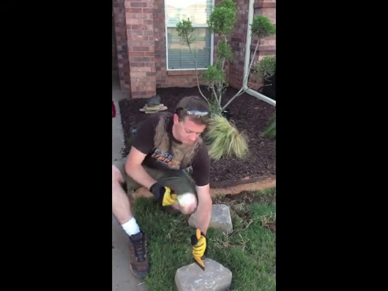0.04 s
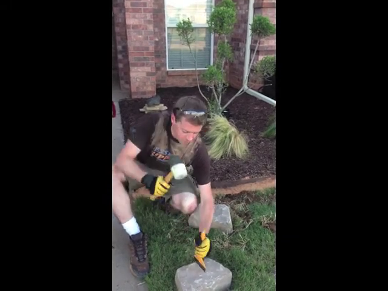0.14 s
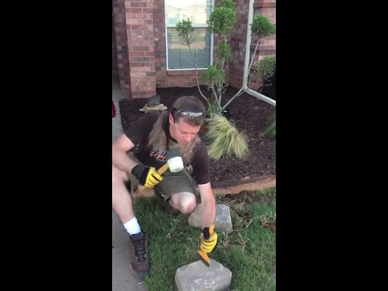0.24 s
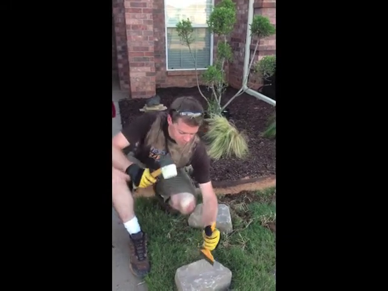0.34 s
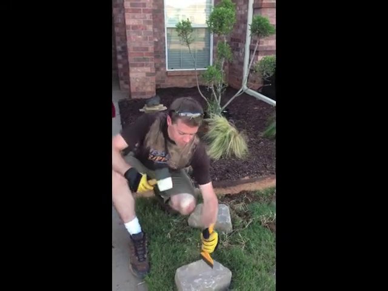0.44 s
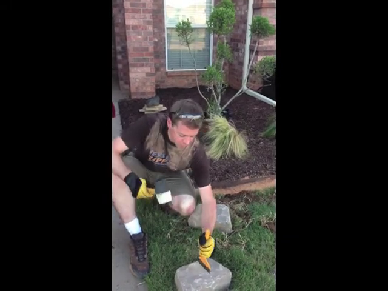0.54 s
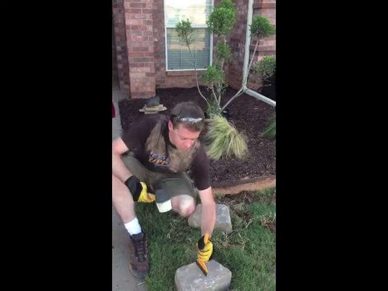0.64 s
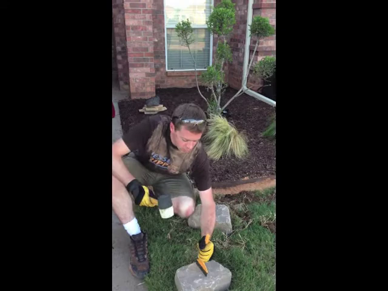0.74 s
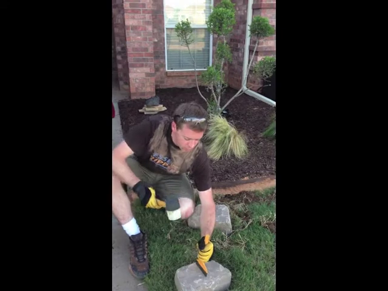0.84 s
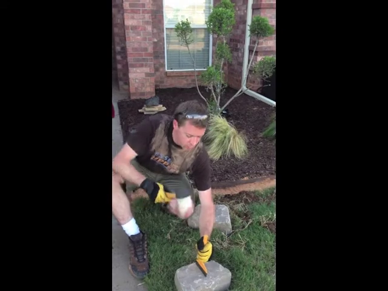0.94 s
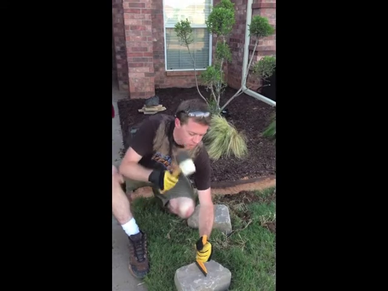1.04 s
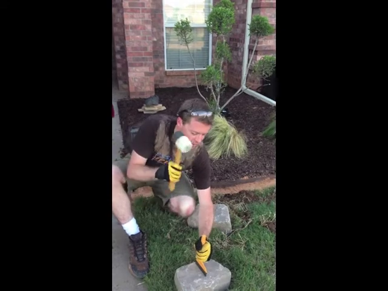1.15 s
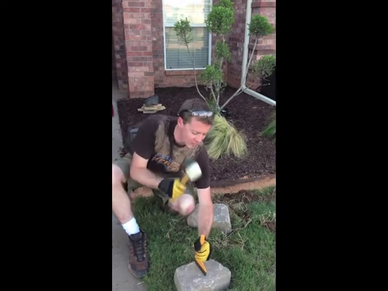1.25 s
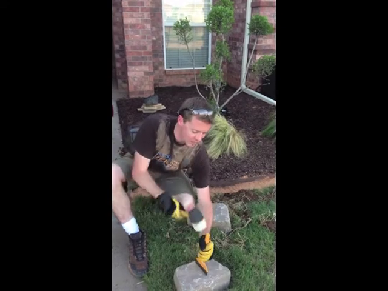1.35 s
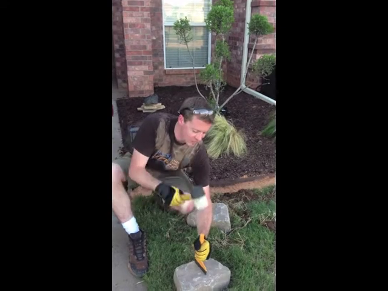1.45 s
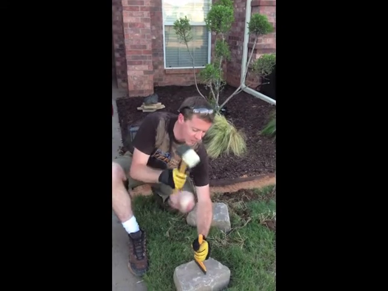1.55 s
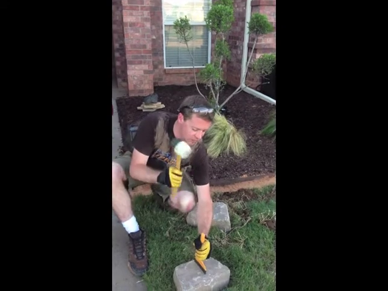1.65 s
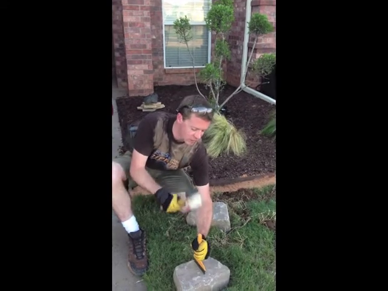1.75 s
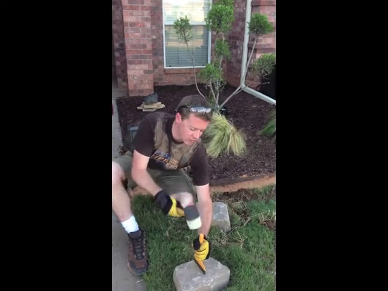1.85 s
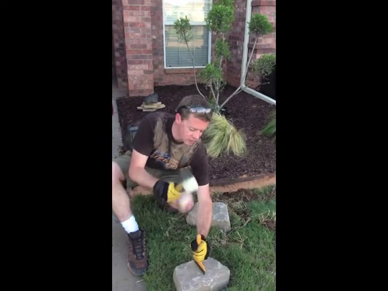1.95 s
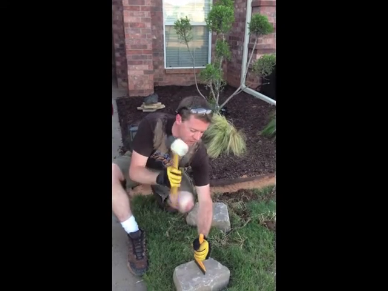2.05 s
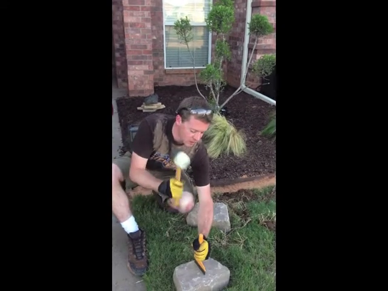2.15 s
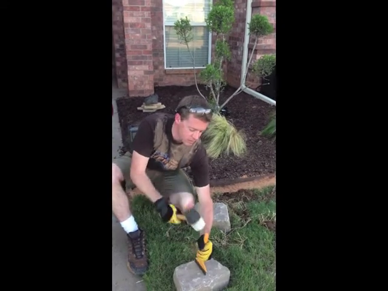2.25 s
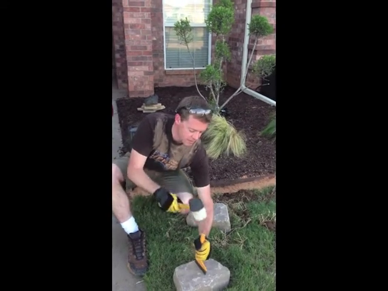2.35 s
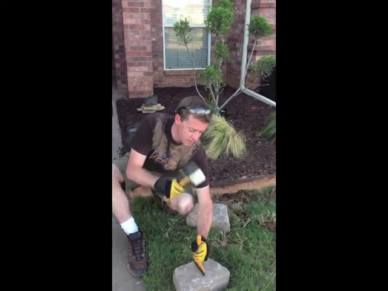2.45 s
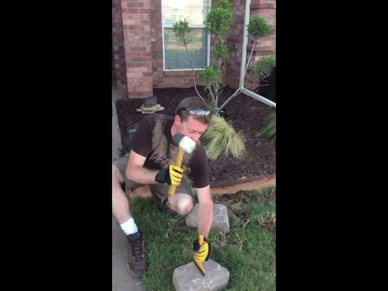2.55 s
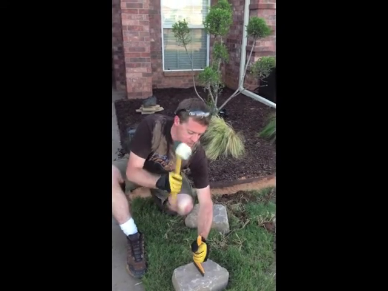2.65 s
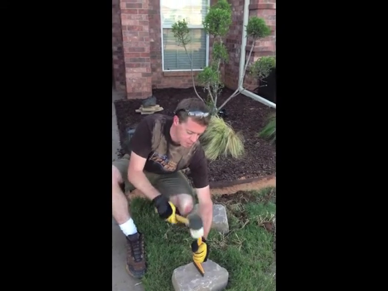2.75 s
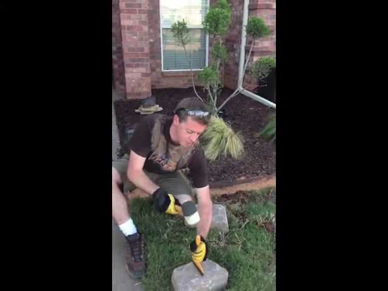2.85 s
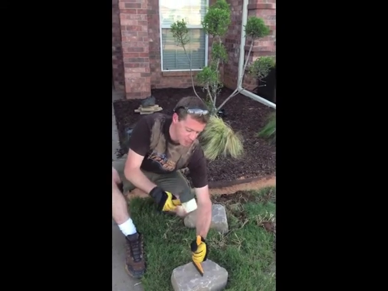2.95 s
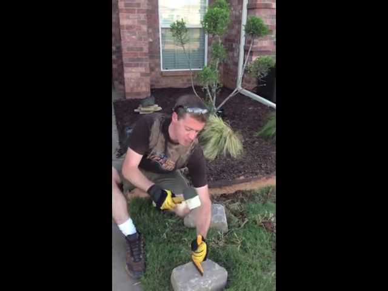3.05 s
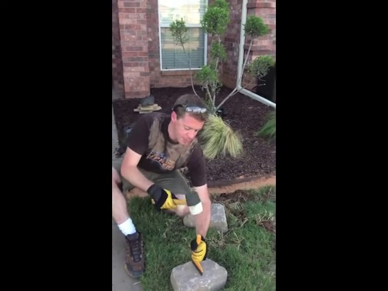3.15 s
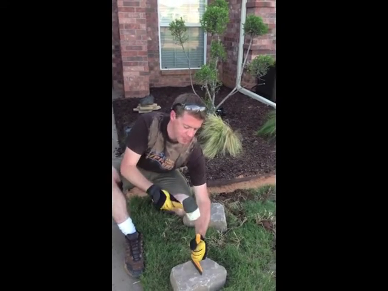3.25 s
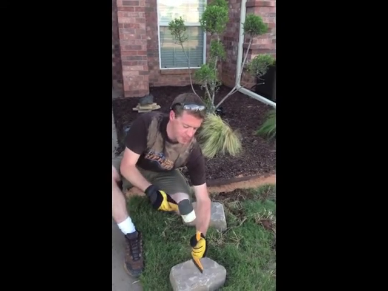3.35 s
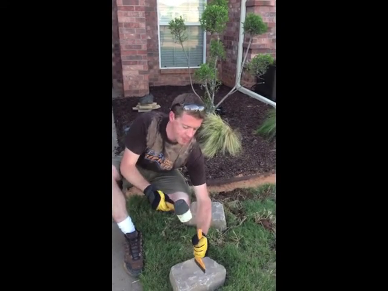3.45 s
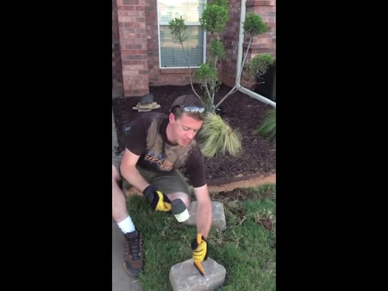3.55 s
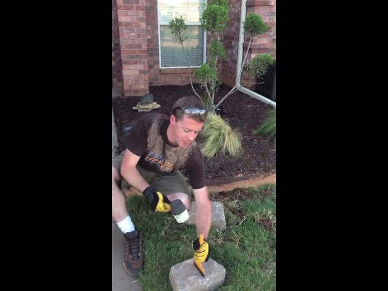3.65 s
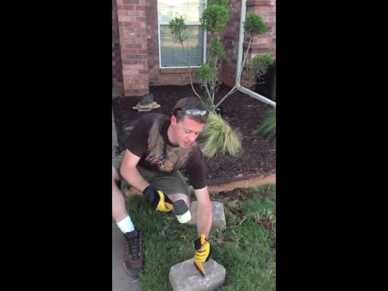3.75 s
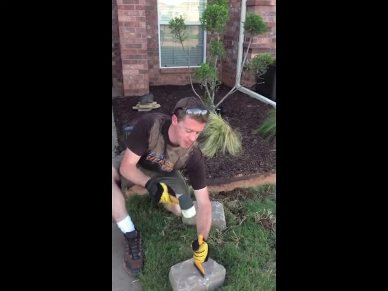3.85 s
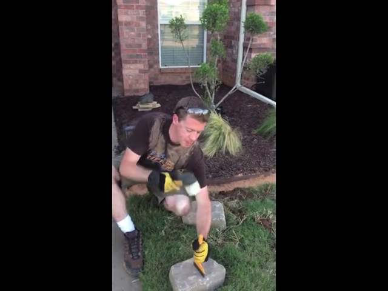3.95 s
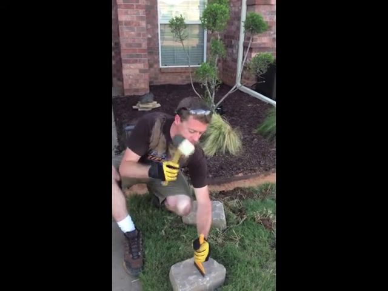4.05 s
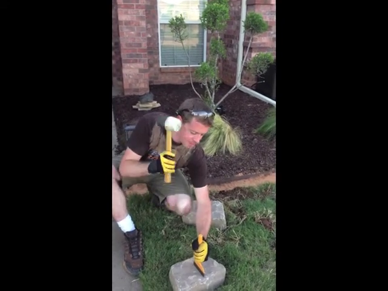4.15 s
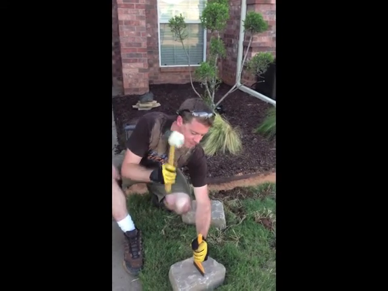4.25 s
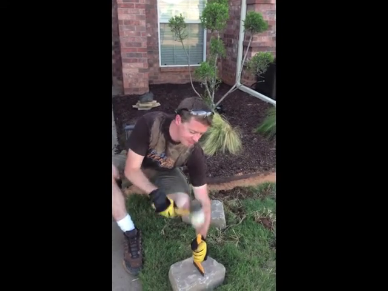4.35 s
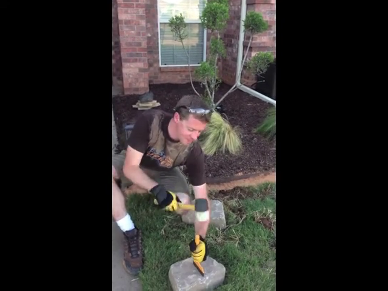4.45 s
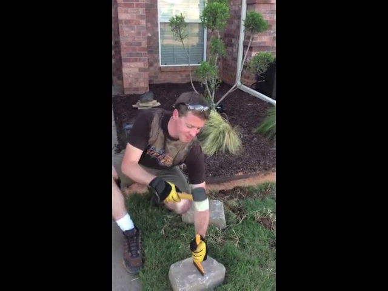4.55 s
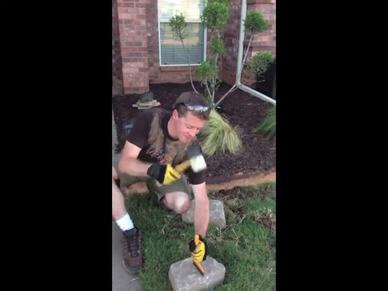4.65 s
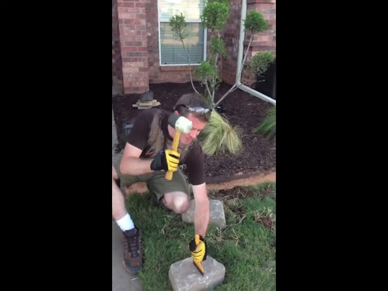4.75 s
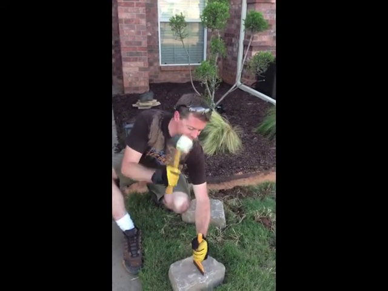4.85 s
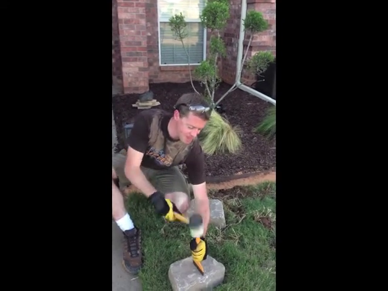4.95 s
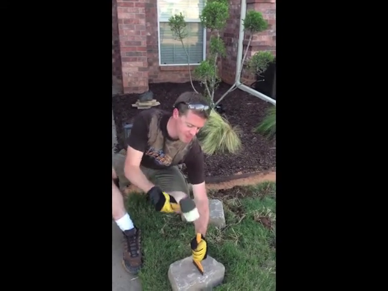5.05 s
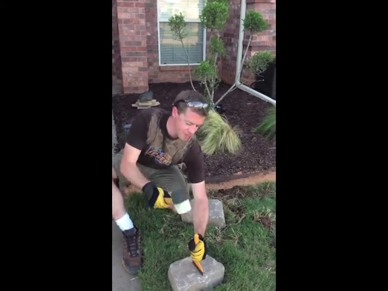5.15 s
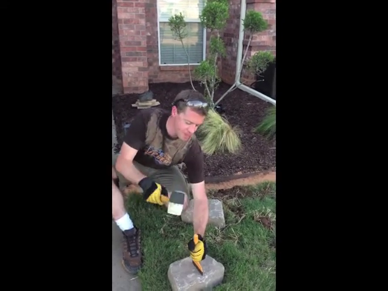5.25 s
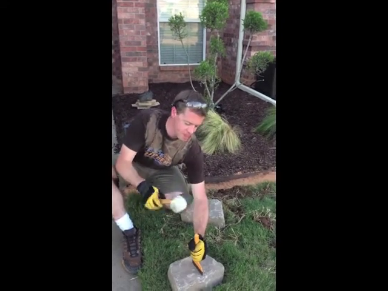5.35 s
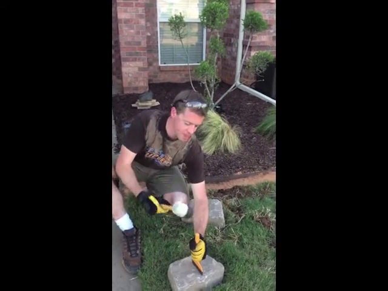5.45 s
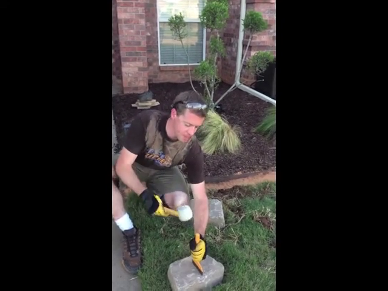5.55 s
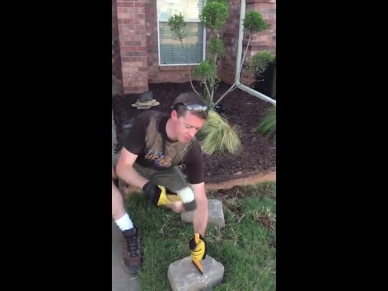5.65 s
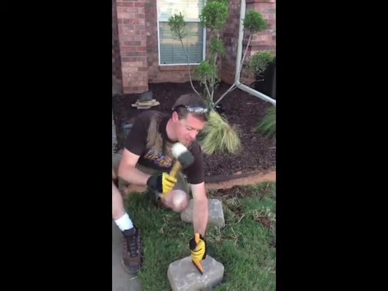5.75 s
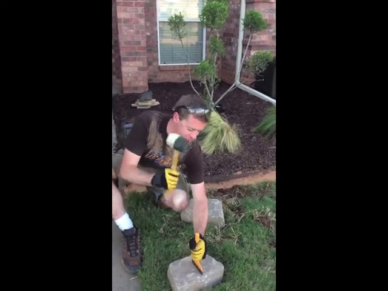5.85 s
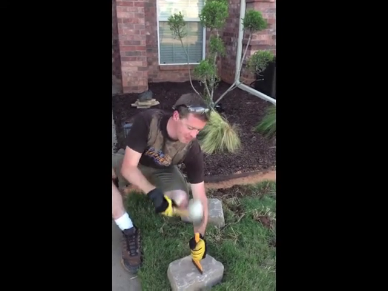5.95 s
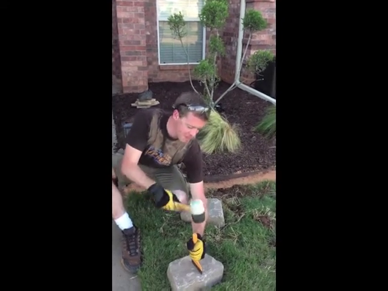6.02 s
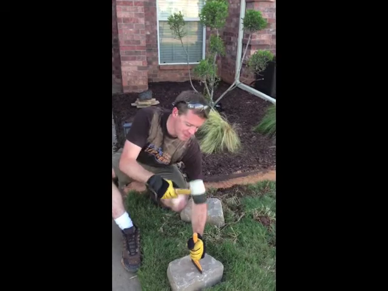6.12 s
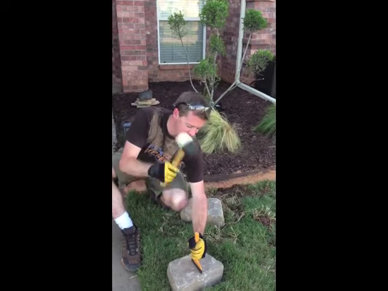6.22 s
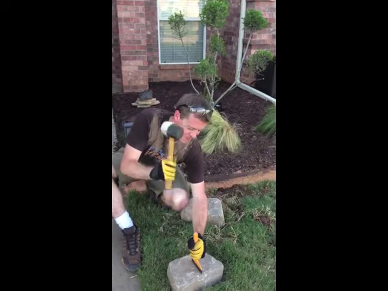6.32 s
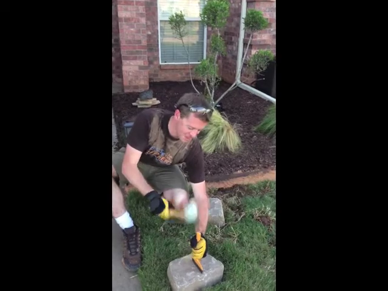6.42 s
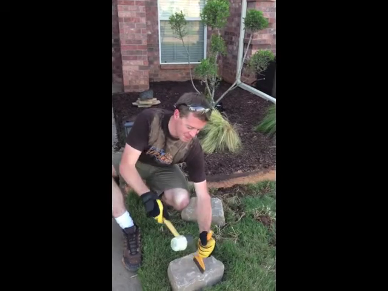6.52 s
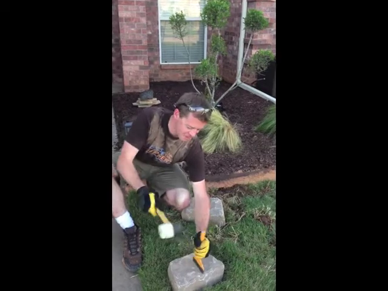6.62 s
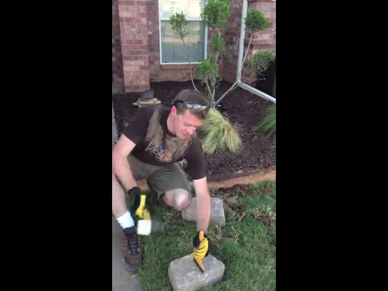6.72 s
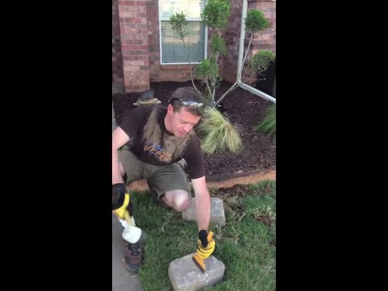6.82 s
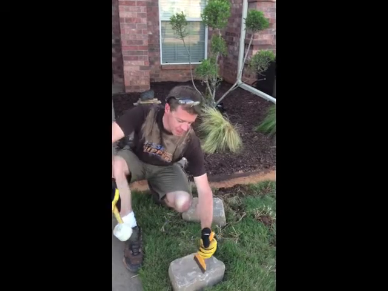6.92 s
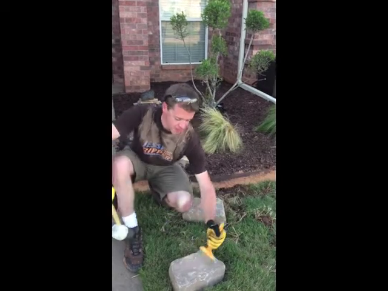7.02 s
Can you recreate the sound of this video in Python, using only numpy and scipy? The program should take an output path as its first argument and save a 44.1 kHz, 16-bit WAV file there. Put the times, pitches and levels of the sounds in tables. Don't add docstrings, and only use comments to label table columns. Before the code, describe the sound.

Ten or so irregular thudding, cracking blows on chisel and stone, the loose steel skipping and ringing, with wind puffs and distant traffic.

```python
import sys
import numpy as np
from scipy import signal
from scipy.fft import rfft, irfft, next_fast_len
from scipy.io import wavfile
from scipy.ndimage import uniform_filter1d

SR = 44100
rng = np.random.default_rng(int(sys.argv[2]) if len(sys.argv) > 2 else 0)


def unload_wav(signal):
    wavfile.write(
        sys.argv[1],
        SR,
        np.round(np.clip(np.atleast_2d(signal).T, -1, 1) * 32767).astype(np.int16),
    )


def volts(x):
    e = np.asarray(x, float) / 20
    return 10 ** e


N = 312228
LEAD = SR // 10
SPAN = SR // 3
T = np.arange(SPAN) / SR

# start in seconds, thud in dB, handle knock in dB over the thud.
BLOWS = [(-.05, -10, -16), (0.6899, -24.5, 3), (1.4034, -12.5, -7.5), (1.8641, -16.5, -1),
         (2.3108, -12, -5.5), (2.8302, -11.5, 2.5), (3.6366, -18, 5), (4.4452, -10, -6), (5.035, -9, -8.5),
         (6.0439, -4, -7), (6.5101, -9.5, -3)]
# crack in dB, its centre in Hz, first spike in dB,
# block note in Hz, that note in dB.
BITES = [(-9, 3100, -2, 3020, 6), (-16, 6500, -4.5, 1380, -16.5), (-6, 2700, -7.5, 1870, -6.5),
         (1.5, 3250, 5.5, 2800, -2), (-8, 2040, -35, 2130, -16), (-6.5, 2600, -5.5, 1970, -17),
         (-6.5, 3550, -0.5, 1450, -8.5), (0.5, 2920, 1.5, 2030, -3.5), (-12.5, 2100, -10.5, 1700, -11),
         (-4, 4050, -37, 2130, 2.5), (-8, 1200, -9, 2160, -5)]
# frequency in Hz, width in Hz, level in dB.
HEAD = [(248, 62, 3.5), (1040, 100, -7.5)]
# frequency in Hz, width in Hz.
HANDLE = (701, 264)
# frequency in Hz, width in Hz, level in dB.
SPOT = [(1480, 180, 0.5), (2150, 30, 3.5), (2375, 33, 2), (3130, 44, -2.5), (3830, 58, -4.5),
        (4430, 50, -6.5), (5550, 71, -2.5), (6850, 23, -5.5), (7910, 70, -9.5)]
# start in seconds, frequency in Hz, level in dB.
RINGS = [(.692, 6900, -44), (0.691, 12200, -36), (1.405, 11840, -28), (1.406, 8100, -26),
         (1.865, 2974, -12), (1.92, 2790, -26.5), (1.99, 2760, -38.5), (4.501, 4360, -36),
         (4.56, 4430, -40), (1.865, 11900, -20), (2.313, 11880, -37), (2.832, 11800, -33),
         (3.638, 3050, -18), (3.639, 6750, -22), (3.635, 12700, -30), (4.445, 4090, -13.5),
         (4.445, 11800, -34), (5.038, 3960, -27), (6.045, 3830, -19), (6.517, 12150, -26),
         (1.868, 6850, -19), (0.692, 8560, -27)]
# start in seconds, ring in dB, grit in dB relative to the ring,
# first bright mode in Hz.
SKIPS = [(0.6916, -12, 0, 5220), (2.4124, -35, -7, 5260), (1.4087, -8, -12, 5830), (1.4462, -17, 1.5, 5500),
         (1.5216, -23, -6.5, 5620), (1.5376, -27.5, -7, 5820), (1.5544, -27, -3, 5870),
         (1.6148, -32.5, -0.5, 5750), (1.8714, -14, -10, 5570), (2.311, -13, -5, 5300),
         (2.3452, -19, 5, 5140), (2.3526, -3, -2, 5330), (2.3873, -7.5, -14, 5550),
         (2.4329, -22, -6.5, 5700), (2.4474, -27, 4.5, 5500), (2.4567, -27, -8, 5340),
         (2.4653, -16, -3, 5300), (2.84, -19, 3, 5530), (2.876, -30, -10, 5670), (3.6557, -9.5, -9, 5300),
         (6.5161, 2, -8, 5530), (6.574, -9.5, -14, 5620), (6.593, -15.5, -14, 5500),
         (6.6064, -9, -10, 5840), (6.6221, -12.5, -6, 5710), (6.6744, -26.5, -2, 5430),
         (6.6793, -21, -9, 5820), (6.7223, -32.5, -4, 5800), (6.7471, -38, -3, 5720)]
# start in seconds, ring in dB,
# grit in dB relative to the ring, first bright mode in Hz.
SETS = [(1.5838, -43, 5, 5360), (2.301, -45, 14, 5630), (3.625, -42, 14, 5600), (1.263, -26, -6, 5570),
        (1.3324, -34, 4, 5360), (1.3395, -21, -11, 5630), (1.7883, -35, -7, 5600), (1.8014, -35, -5, 5600),
        (1.8135, -35, 7, 5900), (1.8211, -21.5, -2.5, 5660), (1.8467, -24, -2, 5500),
        (2.575, -29, -9, 5630), (2.5808, -22, -3.5, 5580), (2.6906, -33, -7, 5870),
        (3.34, -27.5, -12, 5250), (3.3493, -21, -14, 5280), (3.93, -35.5, 5, 5630), (6.8385, -33, -7, 5450)]
# free frequency in Hz, level in dB, t60 as a multiple of the tap's.
STEEL = [(2830, -17, 1.6), (3070, -24, 1.6), (3880, -37, 1.3), (5300, 2.5, 1.01), (6195, -5, 1.01),
         (6800, -15, 1.8), (8300, -4.5, 1.1), (9900, -43, 1.01), (10150, -15.5, .9), (11900, -44, 1.5),
         (11700, -22, 2.5), (14360, -25, .9)]
# frequency in Hz, width in Hz, level in dB.
STONE = [(1540, 420, -2.5), (1870, 280, 3), (2274, 390, -2.5), (3360, 290, -3), (4100, 1150, -11.5)]
# start in seconds, level in dB.
LIFT = (6.998, -33.5)
# frequency in Hz, level in dB, t60 in seconds.
FREE = [(2880, -16, 5.0), (3270, -15, 1.9), (3698, -15, 0.11), (5240, -12, 0.14), (6175, -11, 0.14),
        (6783, -11, 0.29), (8323, -3.5, 0.31), (10350, -10, 0.2), (12210, -18, 0.23), (14440, -21, 5.0),
        (15150, -21, 0.56)]
# start in seconds, peak in dB, frequency in Hz.
PUFFS = [(0.39, -33.5, 176), (1.039, -28.5, 171), (1.501, -30, 150), (2.07, -28, 185), (2.735, -29, 198),
         (2.76, -32, 232), (3.782, -35, 137), (4.331, -36, 128), (2.969, -31.5, 204), (2.983, -26, 247),
         (3.141, -30.5, 141), (3.262, -35, 155), (3.33, -28, 154), (3.446, -26, 138), (3.476, -29, 226),
         (3.514, -22.5, 181), (3.552, -30, 166), (3.589, -29.5, 172), (3.653, -9.5, 225), (3.869, -37, 132),
         (3.919, -37, 207), (3.961, -40, 244), (3.973, -26.5, 285), (3.988, -11, 199), (4.059, -41, 171),
         (4.231, -32.5, 256), (5.287, -38, 257), (6.303, -33, 150), (6.85, -40, 278)]
# start in seconds, length in seconds, top pitch in Hz, fall in Hz, level in dB.
BIRDS = [
    (.19, 0.033, 5250, 50, -51),
    (0.497, 0.052, 3880, 40, -51),
    (.747, 0.045, 2950, 130, -49),
    (0.91, 0.045, 2880, 130, -49),
    (5.875, .08, 4400, 400, -47),
    (6.886, 0.064, 4450, 456, -46),
    (7.024, .033, 3690, 100, -46),
]
# time in seconds, level in dB.
WIND = [(0.0, -40.5), (0.57, -40.5), (1.12, -43.5), (1.44, -40), (1.81, -42.5), (2.03, -50), (2.98, -41),
        (3.1, -45), (3.33, -45.5), (3.51, -36), (3.77, -42), (5.15, -43), (5.48, -41), (7.08, -40)]
# frequency in Hz, level in dB per Hz.
RUMBLE = [(15, -70), (25, -26), (64, -17), (112, -10.5), (134, -1.5), (178, 0.5), (472, -7.5), (509, -9.5),
          (900, -28.5), (1170, -54), (1980, -120)]
# frequency in Hz, level in dB per Hz.
TRAFFIC = [(350, 1.5), (600, -4.5), (857, -1), (944, -4), (1210, -2.5), (1850, -9), (4000, -12),
           (6000, -23), (7800, -24), (13200, -120)]
# frequency in Hz, level in dB per Hz.
HISS = [(2650, -23), (4500, 0), (5810, -2), (14700, -5), (15700, 1.5), (16000, -34)]
# frequency in Hz, t60 in seconds, level in dB.
WALLS = [(150, 0.065, 12.5), (497, 0.2, 2.5), (1130, 0.046, -4.5), (2690, 0.077, 4.5), (6900, 0.11, -1),
         (14000, 0.071, -9)]


def mallet():
    out = np.zeros(LEAD + N + SPAN)
    for (s, thud_db, knock_db), bite in zip(BLOWS, BITES):
        crack_db, centre_hz, edge_db, note_hz, note_db = bite
        shove = np.sin(np.pi * np.clip(T / 0.00068, 0, 1))
        push = shove + 0.58 * burst(hold=0.0061, t60=0.016)
        body = widened([HEAD[0], (*HANDLE, knock_db), HEAD[1]], extra_hz=91)
        thud = volts(thud_db + 8) * struck(push, body)

        spot = []
        for hz, width, db in SPOT:
            off_centre_db = 7.5 * abs(np.log2(hz / centre_hz))
            spot.append((hz, width, db - off_centre_db + 1.2 * rng.standard_normal()))
        crush = burst(hold=0.0039, t60=0.022) + 6.5 * (T == 0)
        crack = volts(crack_db) * struck(crush, widened(spot, extra_hz=480))

        spike_modes = [(6940, 11200, -0.17), (11000, 4300, -1.1)]
        edge = volts(edge_db - 1) * struck(burst(hold=0.0001, t60=0.0096), spike_modes)
        note = volts(note_db) * struck(burst(hold=0.00027, t60=0.0051), [(note_hz, 300, 0)])
        note = note * volts([[0], [-6]])
        add(out, s, walls(volts(3) * (crack + thud + edge + note), wet_db=-17))

        ground = filtered(thud[0], lambda f: 1 / (1 + 1j * f / 350) ** 2)
        add(out, s - 0.006, volts(-21) * ground)
    for s, hz, db in RINGS:
        t60 = 0.13 * (3000 / hz) ** 0.2
        add(out, s, sines(np.array([[hz]]), db, t60, rough=0.45))
    return out[LEAD:LEAD + N]


def chisel():
    out = np.zeros(LEAD + N + SPAN)
    for s, db, grit_db, hz in SKIPS + SETS:
        grit = struck(burst(hold=0.0014, t60=0.034), STONE)
        scrape = struck(burst(hold=0.0014, t60=0.025), [(1.16 * hz, 2500, 0), (9000, 4000, -5)])
        upper_db = 3.5 - 0.32 * (db + 24)
        steel = peak(ring(hz, 0.03, upper_db))
        tap = steel + volts(0.54 * grit_db - 10.5) * scrape + volts(grit_db - 0.5) * grit
        add(out, s - 0.0005, walls(volts(db) * tap, wet_db=-17.5))
    hz, db, t60 = np.transpose(FREE)[:, :, None]
    lift_s, lift_db = LIFT
    add(out, lift_s, volts(lift_db) * sines(hz, db, np.minimum(t60, 0.6), rough=0.06))
    return out[LEAD:LEAD + N]


def ring(first_hz, t60, upper_db):
    hz, db, life = np.transpose(STEEL)[:, :, None]
    free = STEEL[3][0]
    hz = hz + (first_hz - free) * np.clip(free / hz, 0, 1) ** 0.72
    db = db + upper_db * np.log2(hz / free) + 2.5 * rng.standard_normal(hz.shape)
    return sines(hz, db, t60 * life, rough=0.35)


def sines(hz, db, t60, rough):
    knots = rng.standard_normal((2, len(hz), SPAN // 60 + 2))
    at = np.arange(SPAN) / 60
    strength, bend = [np.array([np.interp(at, np.arange(len(k)), k) for k in part]) for part in knots]
    phase = 2 * np.pi * (hz * T + rng.random(hz.shape)) + 1.3 * rough * bend
    wave = (1 + rough * strength) * np.sin(phase)
    onset = 1 - np.exp(-T / 0.00029)
    return (volts(db - 60 * T / t60) * wave).sum(0) * onset


def struck(force, modes):
    sound = peak(filtered(force, resonances(modes)))
    click = filtered(T == 0, resonances(modes))
    return np.array([sound, click * np.linalg.norm(sound) / np.linalg.norm(click)])


def burst(hold, t60):
    return rng.standard_normal(SPAN) * volts(-60 * np.maximum(T - hold, 0) / t60)


def resonances(modes):
    def response(f):
        total = 0
        for k, (centre, width, db) in enumerate(modes):
            damping = 1j * f * width
            total = total + (-1) ** k * volts(db) * damping / (centre ** 2 - f ** 2 + damping)
        return total
    return response


def widened(modes, extra_hz):
    return [(hz, width + extra_hz, db) for hz, width, db in modes]


def walls(sound, wet_db):
    at, t60, db = np.transpose(WALLS)
    hz, t, z = signal.stft(rng.standard_normal(SPAN), SR, nperseg=256)
    hz = hz[:, None]
    lumps = volts(2.1 * rng.standard_normal(len(t)))
    near = volts(along(hz, at, db) - 60 * np.maximum(t - 0.045, 0) / along(hz, at, t60))
    far = volts(-5.5 - 60 * t / 0.69) * (hz < 5000)
    reached = t > 0.004
    tail = signal.istft(z * reached * lumps * (near + far), SR, nperseg=256)[1][:SPAN]
    tail = tail / np.linalg.norm(tail)
    tail[round(0.035 * SR)] += volts(-22.5)
    return sound[0] + volts(wet_db) * signal.fftconvolve(sound[1], tail)[:SPAN]


def puffs():
    out = np.zeros(LEAD + N + SPAN)
    for s, db, hz in PUFFS:
        u = np.clip(T * hz / 3.84, 0, 1)
        phase = 2 * np.pi * (hz * T + rng.random())
        air = filtered(rng.standard_normal(SPAN), resonances([(1.05 * hz, 0.26 * hz, 0)]))
        air = filtered(air, lambda f: 1 / (1 + 1j * f / 600) ** 2)
        cycles = np.sin(phase + 0.36 * np.sin(phase))
        swell = np.sin(np.pi * u) ** 2
        add(out, s - 0.004, volts(db + 7.5) * swell * (cycles + 0.51 + 0.34 * unit(air)))
    return out[LEAD:LEAD + N]


def birds():
    out = np.zeros(LEAD + N + SPAN)
    for s, length, top_hz, fall_hz, db in BIRDS:
        u = np.clip(T / length, 0, 1)
        waver = unit(uniform_filter1d(rng.standard_normal(SPAN), size=120))
        hz = top_hz - fall_hz * np.interp(u, [0, 0.4, 1], [0.3, 0, 1]) + 150 * waver
        tone = volts(db) * np.sin(np.pi * u) * np.sin(2 * np.pi * np.cumsum(hz) / SR)
        add(out, s, walls([tone, tone], wet_db=-10))
    return out[LEAD:LEAD + N]


def street():
    t = np.arange(N) / SR
    wind_db = np.interp(t, *np.transpose(WIND))
    traffic_db = -45 + 0.16 * (wind_db - wind_db.mean())
    duck_db = np.interp(t - 1.9, np.cumsum([0, 0.05, 0.37, 0.3]), [0, -4, -4, 0])
    rumble = volts(wind_db + 2) * rush(RUMBLE, patchy_db=2.0)
    traffic = volts(traffic_db) * rush(TRAFFIC, patchy_db=1.86)
    hiss = volts(-55 + duck_db) * rush(HISS, patchy_db=0.6)
    return rumble + traffic + hiss


def rush(spectrum, patchy_db):
    z = signal.stft(rng.standard_normal(N + 512), nperseg=512)[2]
    field = uniform_filter1d(rng.standard_normal(z.shape), size=4, axis=0)
    field = uniform_filter1d(field, size=8, axis=1)
    noise = signal.istft(z * volts(patchy_db * unit(field)), nperseg=512)[1][:N]
    return unit(filtered(noise, lambda hz: volts(along(hz, *np.transpose(spectrum)))))


def unit(x):
    return x / np.sqrt(np.mean(x ** 2) + 1e-20)


def peak(x):
    return x / np.abs(x).max()


def along(hz, at, value):
    return np.interp(np.log(hz + 1), np.log(np.asarray(at) + 1), value)


def filtered(x, response):
    m = next_fast_len(len(x) + SR // 4)
    return irfft(rfft(x, m) * response(np.fft.rfftfreq(m, 1 / SR)), m)[:len(x)]


def add(track, s, sound):
    track[LEAD + round(s * SR):][:len(sound)] += sound


def scene():
    return (mallet() + chisel() + puffs() + birds() + street())[None]


def top_cut(x):
    return signal.sosfilt(signal.butter(12, 16390, fs=SR, output="sos"), x)


def record(dry):
    thin = filtered(dry[0], lambda hz: (1j * hz / (95 + 1j * hz)) ** 3 / (1 + (hz / 15400) ** 40))
    clipped = thin / (1 + np.abs(thin / 0.99) ** 12) ** (1 / 12)
    mix = filtered(clipped, lambda hz: 0.3 + 0.71 / (1 + (hz / 16300) ** 40))[None]
    return top_cut(mix)


dry = scene()
out = record(dry)
unload_wav(out)
```